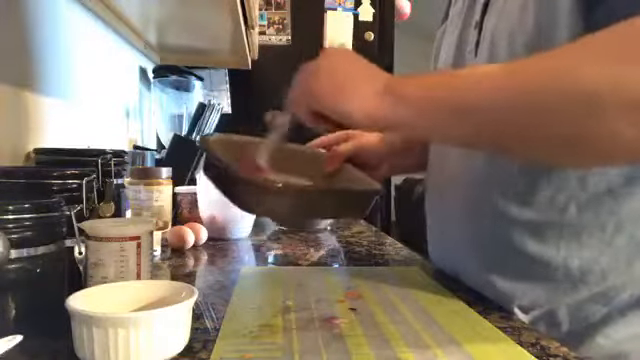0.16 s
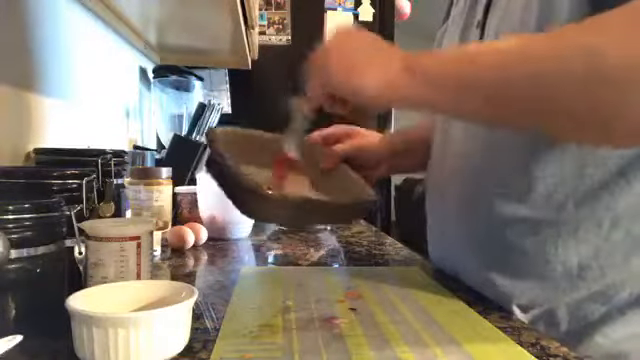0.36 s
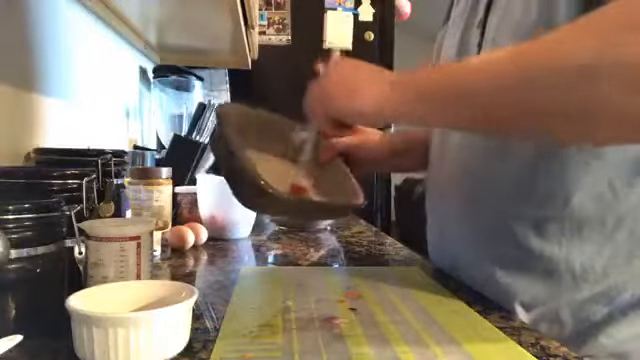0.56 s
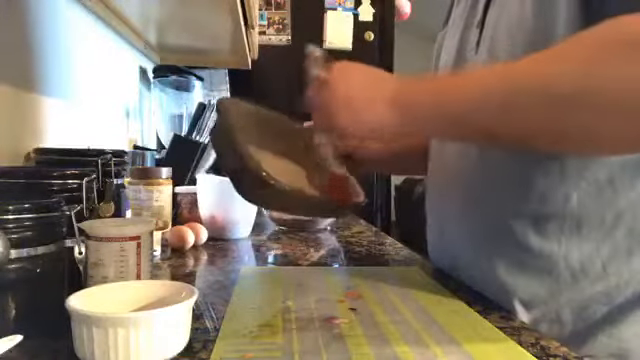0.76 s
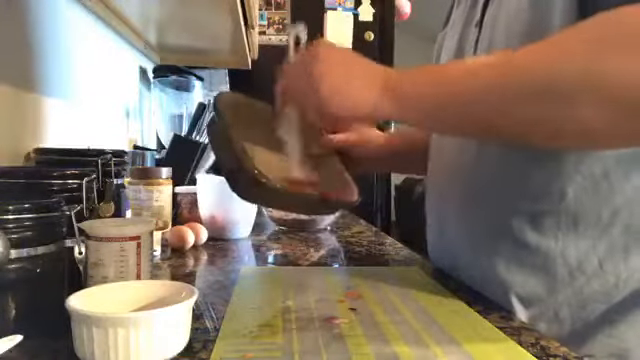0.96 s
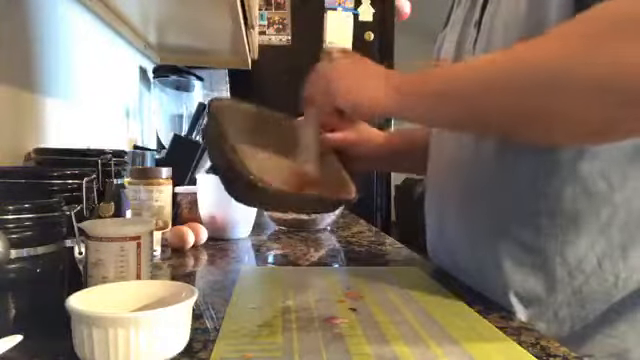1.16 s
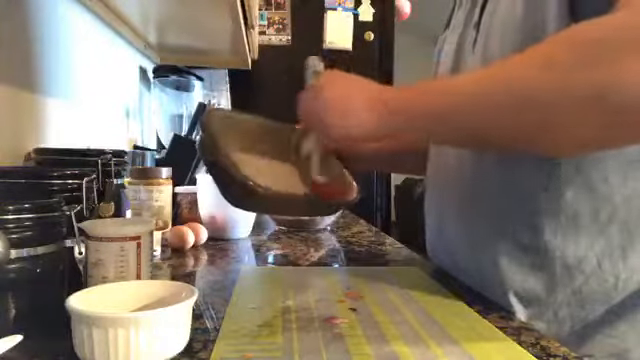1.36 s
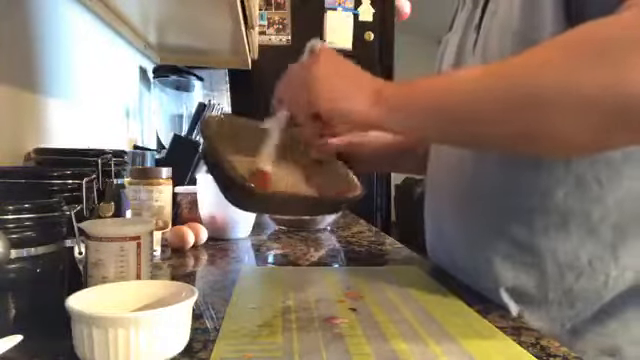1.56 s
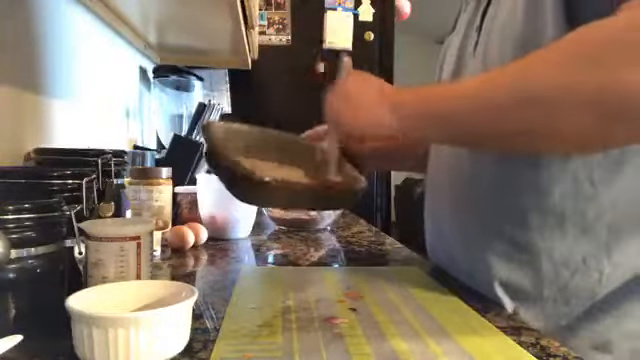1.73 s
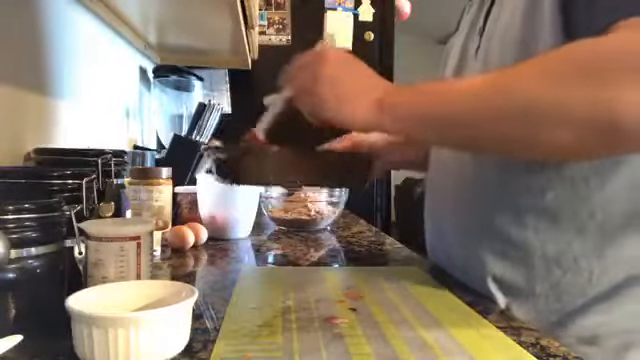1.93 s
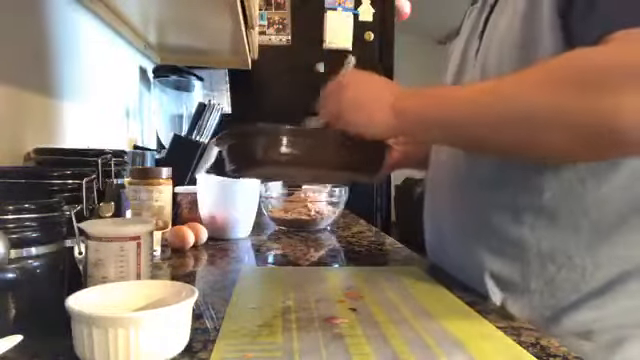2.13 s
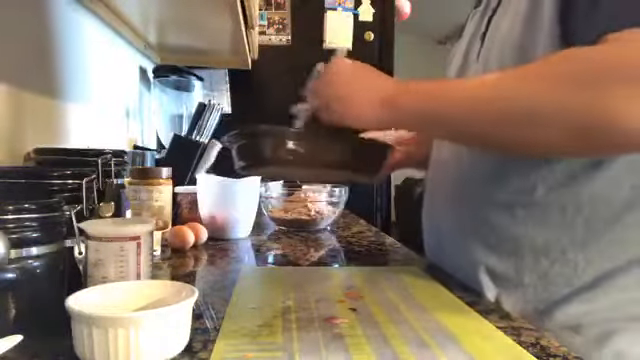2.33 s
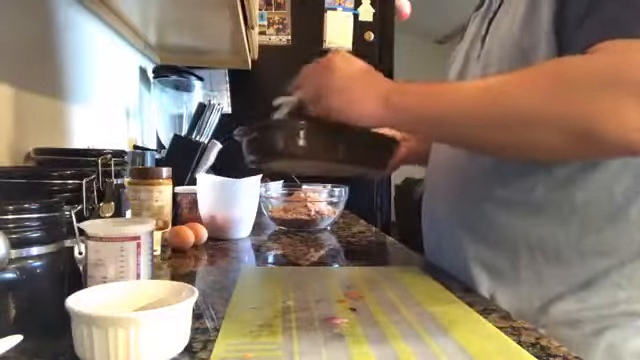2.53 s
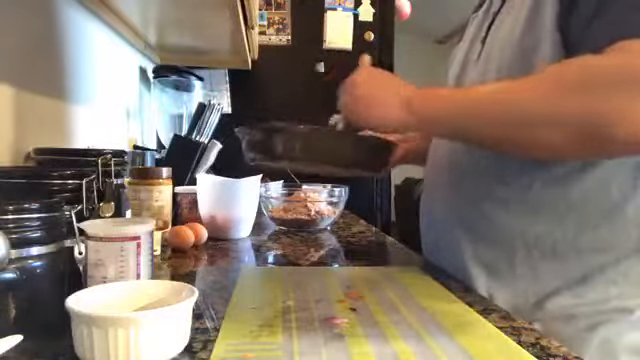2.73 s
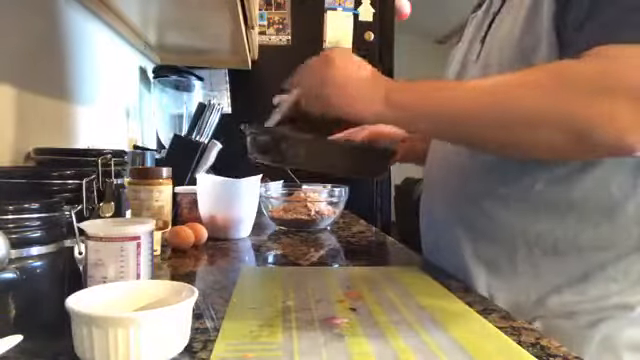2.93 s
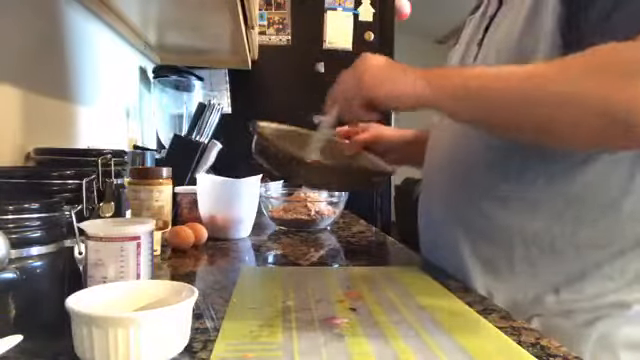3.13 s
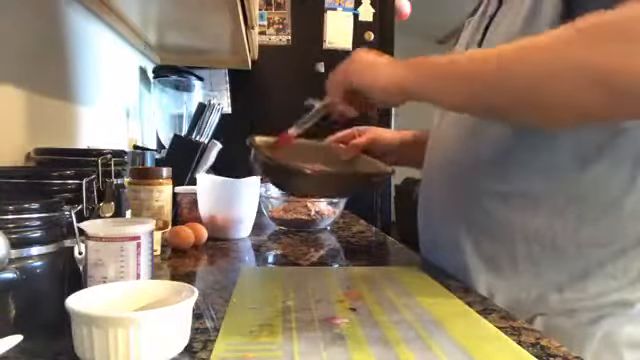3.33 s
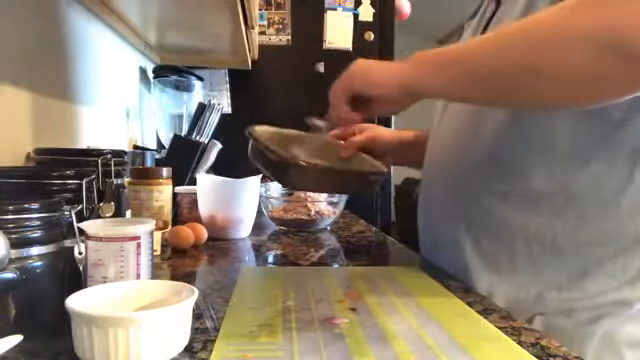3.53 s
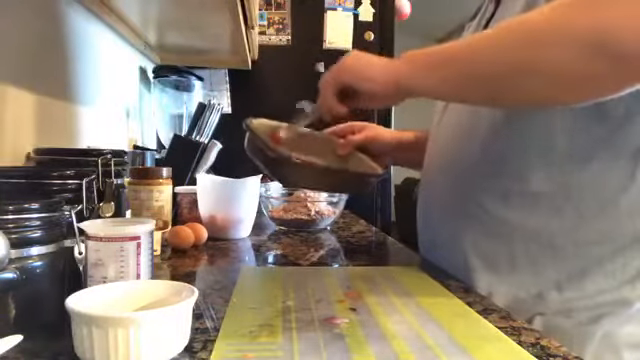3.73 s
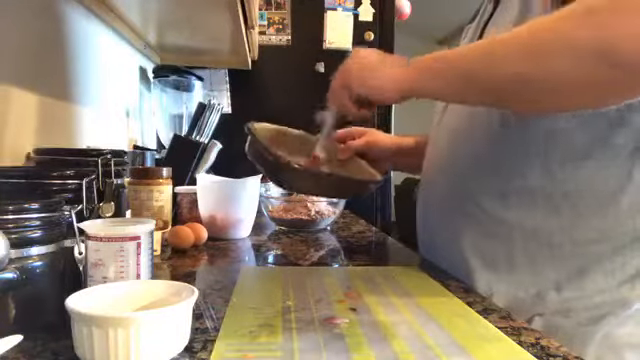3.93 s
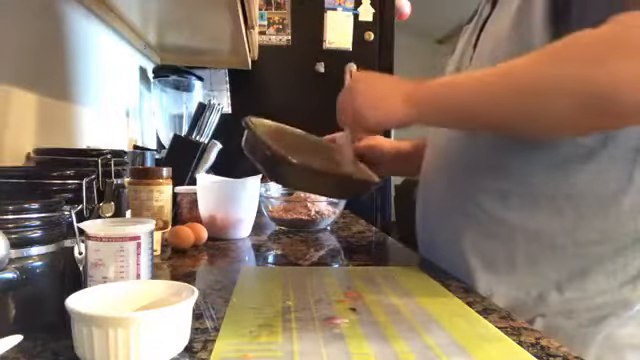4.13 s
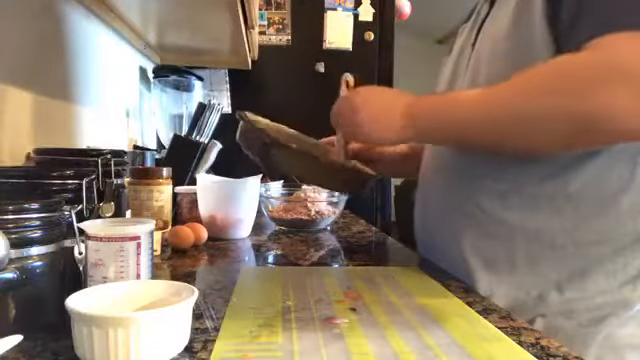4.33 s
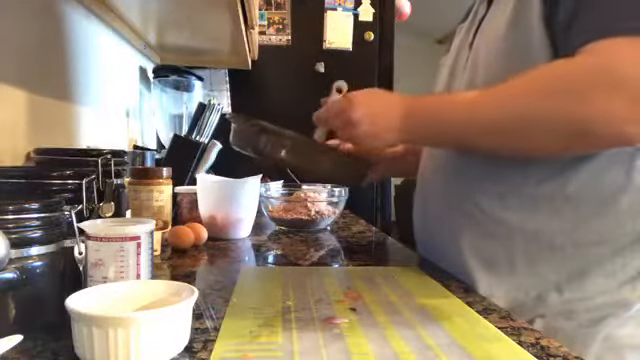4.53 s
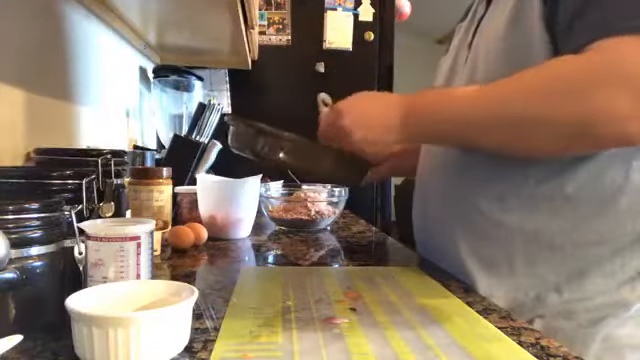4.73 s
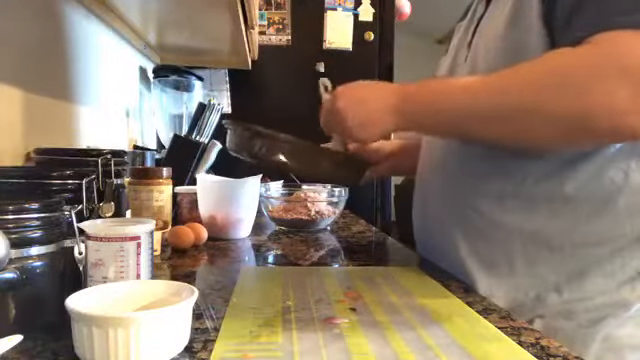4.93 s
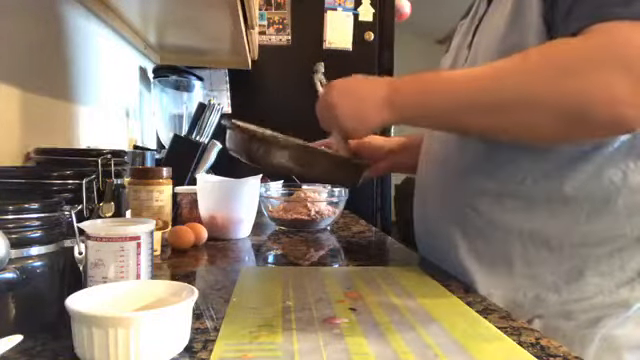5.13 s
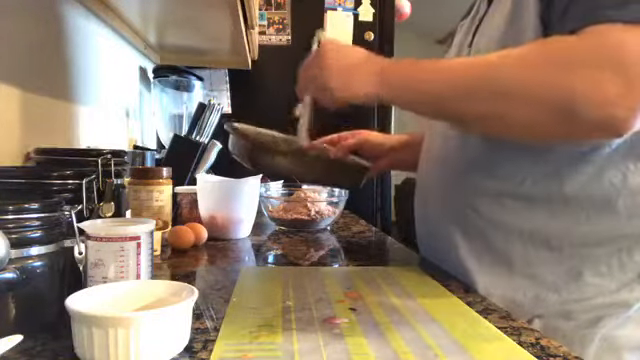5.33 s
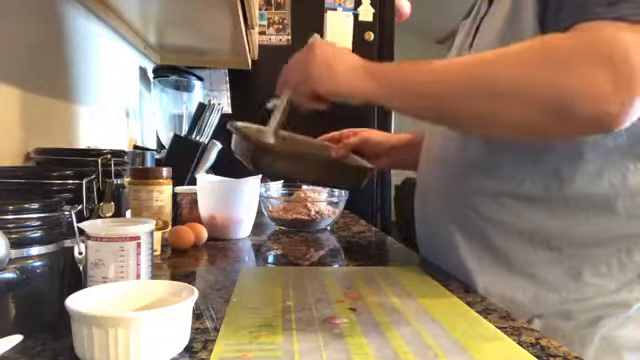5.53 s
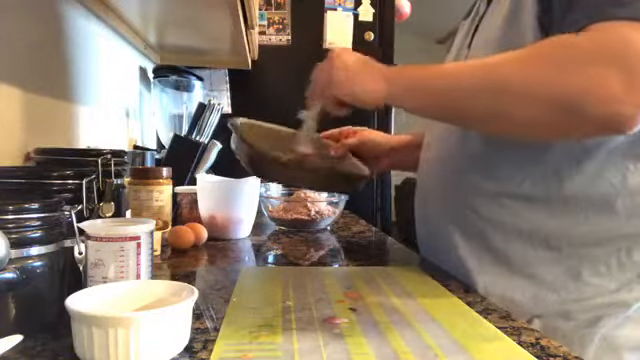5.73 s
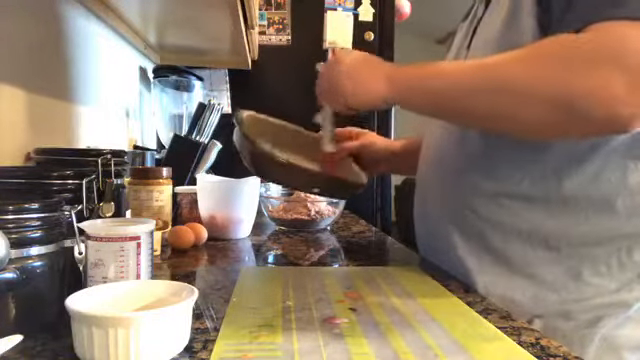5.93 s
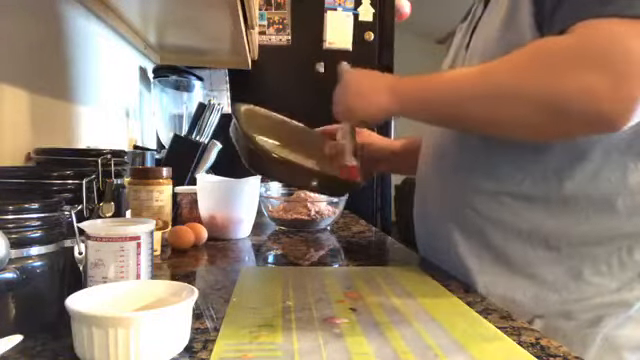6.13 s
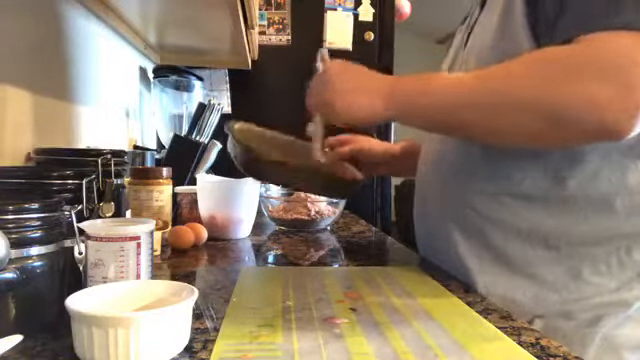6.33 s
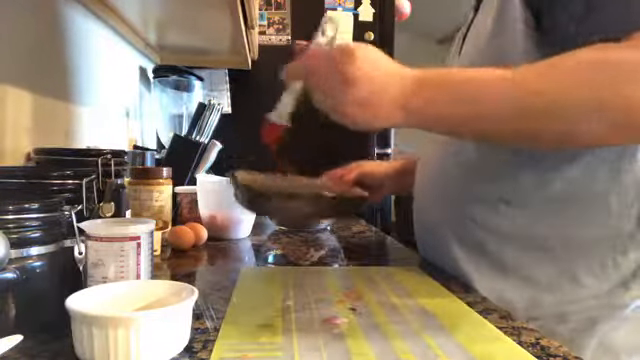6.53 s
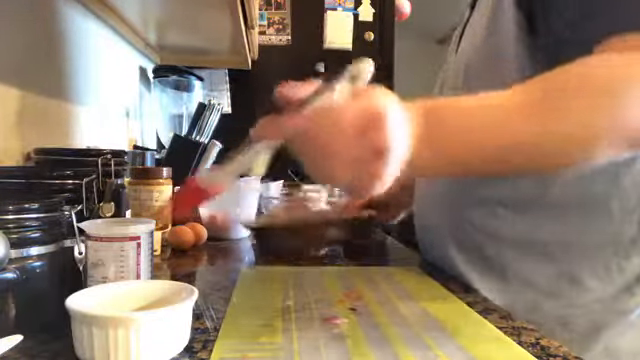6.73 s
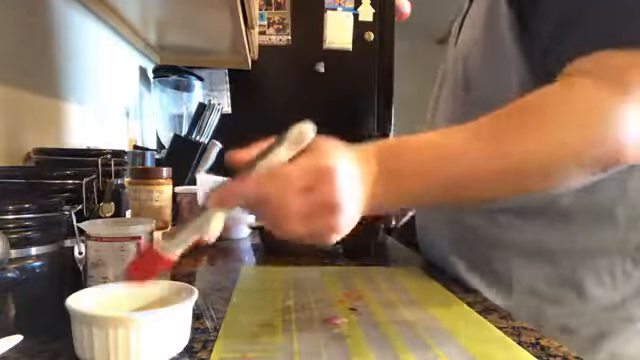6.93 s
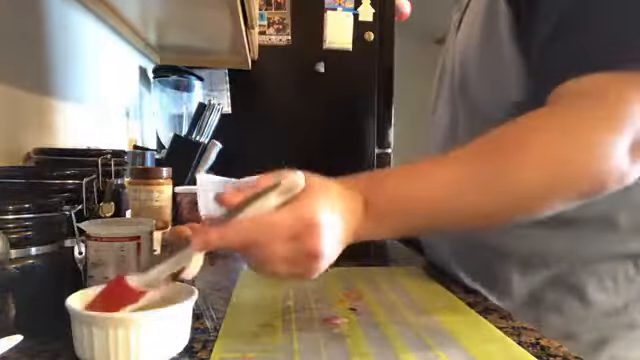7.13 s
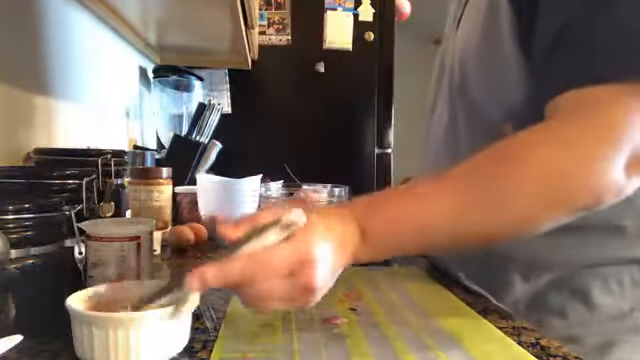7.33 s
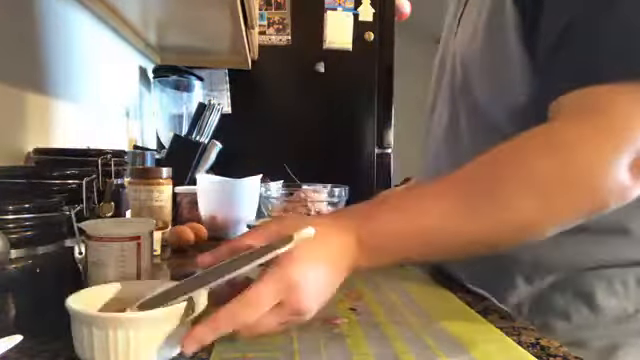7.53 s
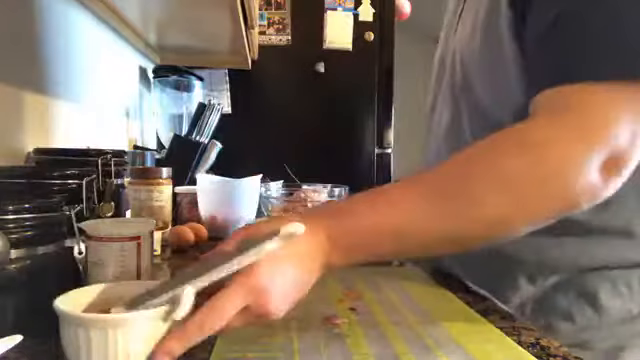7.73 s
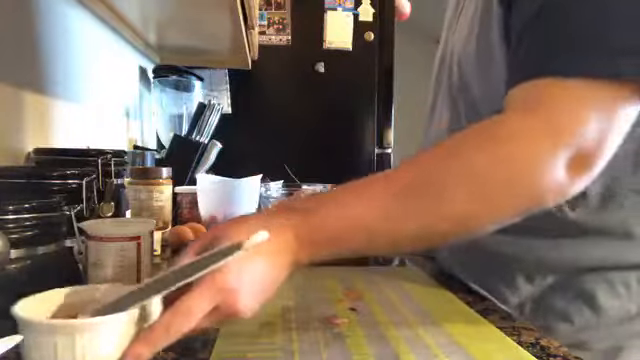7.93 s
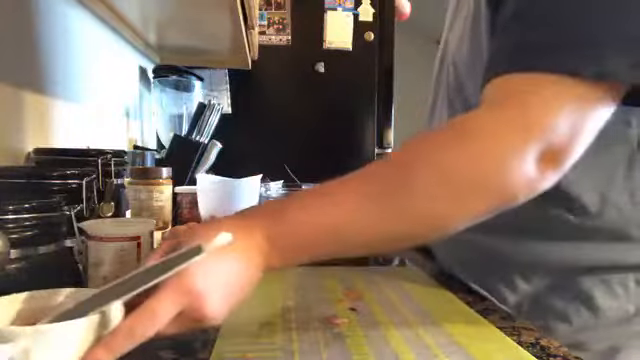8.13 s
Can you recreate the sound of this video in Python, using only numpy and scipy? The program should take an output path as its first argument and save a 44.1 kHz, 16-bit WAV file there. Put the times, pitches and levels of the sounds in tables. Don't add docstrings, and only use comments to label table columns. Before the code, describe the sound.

A quiet kitchen with low, soft room tone and barely audible hum, heard by a close microphone. From 0 to about 6.6 seconds a silicone brush sweeps around a hand-held stoneware dish in short, irregular strokes. Each is a light, bright hiss with faint ceramic ringing and occasional tiny rim ticks; one sharper tick comes at 0.9, and brisk strokes cluster around 1.2 to 1.3. Wet, oily pulls sound near 3.55 and 3.8, then the strokes become sparser and fainter. At about 6.77 the dish lands on stone in a loud, hard clatter of rapid contacts until 6.95, ringing briefly. Softer rocking knocks follow from 7.1 to 7.28. A light bowl touch comes at 7.37, then the brush drops in with a clear clack at 7.58. The bowl drags faintly over stone from 7.66, bumps crockery at 8.02, scrapes hardest at 8.07, and ends with small taps near 8.26.

```python
import sys
import numpy as np
from scipy import signal
from scipy.io import wavfile
from scipy.ndimage import uniform_filter1d

SR = 44100
rng = np.random.default_rng(int(sys.argv[2]) if len(sys.argv) > 2 else 0)


def wav_record(signal):
    frames = np.transpose(np.atleast_2d(signal))
    bounded = np.clip(frames, -1, 1)
    quanta = np.round(bounded * 32767).astype(np.int16)
    wavfile.write(sys.argv[1], SR, quanta)


def convert_level_to_amplitude(level_db):
    exponent = np.asarray(level_db, float) / 20
    return 10 ** exponent


N = 364693

# pitch_hz, density_db (per Hz)
ROOM_TONE = [(18, -46), (30, -3.5), (60, 3.5), (108, -2), (174, -10), (249, -11.5), (335, -9.5),
             (754, -17.5), (1500, -18.5), (2400, -27.5), (3620, -25.5), (6700, -27), (10000, -36.5),
             (16000, -31.5)]
# start_s, end_s, pitch_hz, level_db
HUMS = [
    (.5, 5.1, 120, -70),
    (.3, 2.3, 68, -73),
    (5.05, 5.45, 224, -80),
    (3.25, 3.7, 935, -85),
    (3.33, 3.46, 875, -77),
    (3.45, 3.72, 812, -77),
    (4.94, 5.12, 575, -77),
    (5.6, 6.07, 563, -78),
]
TONE_DB = -65

# pitch_hz, density_db (per Hz)
BRISTLE_HISS = [(240, -49), (400, -10), (511, -20.5), (1400, -15), (1540, -24.5), (2510, -14), (2750, -15),
                (11200, 6), (15500, 5.5)]
# fastest_s, swell_s, fade_s, hiss_db, push_db (into the dish)
FLAT_STROKES = [(0.0, 0.0073, 0.048, -60, -59), (.55, 0.096, 0.12, -65.5, -68),
                (.63, 0.074, 0.18, -57, -54.5), (.73, 0.045, 0.06, -63.5, -71),
                (.99, 0.11, 0.089, -58.5, -55.5), (1.165, .03, 0.13, -68.5, -68),
                (1.224, 0.033, 0.06, -45.5, -55), (1.285, 0.054, 0.061, -49, -63),
                (1.325, 0.061, 0.033, -49.5, -75), (1.7, 0.13, 0.037, -60.5, -65),
                (1.735, 0.051, 0.031, -59, -60), (2.68, 0.065, 0.052, -56, -60),
                (3.14, 0.18, 0.15, -64, -77), (3.55, 0.067, 0.12, -51.5, -58),
                (3.782, 0.014, 0.055, -65, -81), (3.84, 0.1, 0.058, -54.5, -69),
                (4.2, 0.088, 0.061, -60.5, -61), (4.715, 0.042, 0.12, -58.5, -66),
                (4.79, 0.076, 0.1, -65.5, -87), (4.99, 0.11, 0.12, -59.5, -74),
                (5.14, 0.022, 0.068, -65, -75), (5.22, 0.059, 0.079, -58, -84),
                (5.78, 0.13, 0.061, -66, -59.5), (6.17, 0.11, 0.061, -57, -59.5)]
# fastest_s, swell_s, fade_s, hiss_db, push_db (into the dish)
RIM_STROKES = [(0.059, 0.04, 0.057, -61.5, -54), (.26, 0.086, 0.095, -52, -56),
               (1.5, 0.2, 0.14, -58.5, -68), (1.8, 0.068, 0.048, -64, -78), (1.849, 0.096, 0.094, -62, -60),
               (2.16, 0.15, 0.13, -62.5, -55), (2.44, 0.1, 0.093, -63.5, -57.5),
               (2.57, 0.044, 0.047, -76, -58), (2.62, 0.047, 0.069, -62.5, -58),
               (2.73, 0.052, .06, -61.5, -70), (2.835, 0.062, 0.12, -58.5, -51.5),
               (2.9, 0.066, 0.085, -63.5, -66), (3.95, 0.1, 0.062, -75, -67), (4.08, 0.046, 0.22, -65, -69),
               (4.36, 0.17, 0.24, -68, -66), (5.32, 0.18, 0.1, -68, -75), (5.5, 0.1, 0.11, -67.5, -84),
               (5.89, 0.18, 0.067, -66.5, -58.5), (6.1, 0.069, 0.079, -66.5, -53),
               (6.34, 0.057, .05, -68.5, -75), (6.64, 0.14, 0.11, -76, -85)]
HISS_SHAPE, PUSH_SHAPE = 2.31, 2.5
FLAT_HIGH_DB, RIM_LOW_DB = 1, -6.5
RESTING_PUSH_DB = -75
BRIGHT_DB, BRIGHT_PER_DB = -7, 0.13
# pitch_hz, width_hz, level_db
DISH_HELD = [(1390, 5.2, -9), (2229, 40, 3), (2570, 82, 2.5), (3340, 13, -11), (3640, 52, 1),
             (4720, 48, -15.5), (5310, 18, -12.5)]
# start_s, peak_db, ring_db, favoured_hz
FLICKS = [(0.05, -55.5, 3.5, 3360), (0.205, -60, -10, 4720), (0.599, -66, -8, 1385),
          (0.888, -65.5, 4, 2570), (0.898, -41, -15, 1385), (1.19, -56, -19, 4720),
          (1.215, -42.5, -14, 1385), (1.284, -65, -17, 2570), (1.737, -62, -4, 2940),
          (2.107, -71, 11, 2570), (2.805, -60, -8, 3640), (2.83, -56, -7, 2215), (3.5, -55, -6, 5310),
          (3.513, -58, -3, 5310), (3.539, -58, -13, 5310), (3.771, -50, -9, 5310), (3.811, -57, -8, 3340),
          (4.21, -54, -24, 3340), (4.706, -64, -8, 5310), (4.97, -53, -9, 5310), (5.134, -56, -13, 2215),
          (5.212, -53, -5, 3640), (5.35, -72, 7, 3640), (5.46, -72, 7, 3640), (6.335, -67, -4, 3340)]
# loudest_s, swell_s, fade_s, level_db, pitch_hz
SINGING_LOW = [(0.06, 0.024, 0.025, -71, 2570), (0.075, 0.044, 0.09, -68.5, 2205),
               (0.274, 0.04, 0.025, -75, 2205), (0.619, 0.031, 0.075, -78, 2205),
               (0.624, 0.092, 0.071, -68, 1390), (0.663, 0.04, 0.073, -64, 2570),
               (0.693, 0.125, 0.07, -76, 1390), (0.903, 0.025, 0.015, -64, 2570),
               (0.913, 0.04, 0.078, -66, 1390), (1.008, 0.073, 0.058, -64, 1390),
               (1.033, 0.12, 0.054, -68.1, 2205), (1.227, 0.055, 0.028, -66.8, 2205),
               (1.227, 0.064, 0.12, -70, 1390), (1.257, 0.054, 0.11, -68, 2570),
               (1.322, 0.055, 0.039, -71, 2205), (1.746, 0.038, 0.015, -75, 2570),
               (1.831, 0.046, 0.093, -75, 1390), (1.846, 0.043, 0.07, -73, 2205),
               (2.11, 0.025, 0.025, -80, 2570), (2.18, 0.036, 0.081, -66, 2570),
               (2.18, 0.069, 0.05, -68, 2205), (2.449, 0.075, 0.03, -71, 2570),
               (2.454, 0.08, 0.045, -67, 2205), (2.564, 0.03, 0.04, -69, 2570),
               (2.649, 0.067, 0.12, -70, 2570), (2.659, 0.058, 0.067, -68, 2205),
               (2.679, 0.095, 0.032, -85, 1390), (2.839, 0.046, 0.069, -57, 2205),
               (2.854, 0.091, 0.075, -74, 1390), (3.293, 0.071, 0.04, -76, 1390),
               (4.979, 0.04, 0.035, -81, 2570), (4.989, 0.03, 0.039, -67, 2205),
               (5.787, 0.045, 0.18, -84, 2205), (5.792, 0.086, 0.14, -80, 1390),
               (6.136, 0.07, 0.082, -69.0, 2205), (6.161, 0.048, 0.022, -60, 2570)]
# loudest_s, fade_s, level_db, pitch_hz
SINGING_HIGH = [(.07, 0.051, -61, 3640), (.22, .03, -71, 4720), (.23, .05, -73, 5310),
                (.28, 0.032, -63, 3640), (.63, 0.044, -76, 3640), (.72, 0.052, -62, 3640),
                (.72, .04, -82, 3340), (.99, .04, -67, 5310), (1.01, .03, -70, 4720),
                (1.04, .06, -79, 3640), (1.22, .03, -64, 5310), (1.23, 0.046, -63, 3640),
                (1.23, 0.043, -62, 4720), (1.25, .11, -71, 1390), (1.31, .04, -64, 3340),
                (1.48, .07, -69, 3640), (1.85, 0.055, -62, 3640), (1.85, .04, -69, 3340),
                (1.85, .03, -66, 5310), (2.125, .08, -69, 3340), (2.13, 0.051, -71, 3640),
                (2.44, .05, -66, 3640), (2.45, .04, -84, 3340), (2.45, .02, -77, 5310),
                (2.62, .08, -73, 3640), (2.85, .06, -75, 3640), (3.53, .04, -61, 5310),
                (3.57, .04, -77, 3340), (3.775, .03, -87, 5310), (3.79, .05, -70, 3340),
                (3.83, .07, -68, 3340), (4.07, .04, -75, 3340), (4.15, .06, -82, 3640),
                (4.19, 0.037, -71, 3340), (4.36, .08, -74, 3340), (4.72, .04, -81, 3640),
                (5.225, 0.027, -85, 3340), (5.22, 0.036, -83, 3640), (5.363, 0.045, -65.5, 3640),
                (5.47, 0.031, -69, 3340), (5.478, 0.026, -68, 3640), (5.87, 0.033, -71, 3340),
                (6.12, 0.063, -74, 3640), (6.14, .05, -79, 3340)]
SING_SWELL_S = .045
# start_s, end_s, from_hz, to_hz, level_db
SQUEAK = (.765, .85, 11900, 10500, -82)
# loudest_s, swell_s, fade_s, level_db
GRIP = [
    (3.46, 0.092, 0.32, -69.5),
]
# low_hz, high_hz
GRIP_HZ = (830, 1620)
# loudest_s, swell_s, fade_s, level_db
SUCK = [
    (3.555, 0.034, 0.068, -49.5),
    (3.8, .025, 0.033, -56),
]
# low_hz, high_hz
SUCK_HZ = (5030, 7000)

# pitch_hz, level_db, t60_s
COUNTER = [(95.5, -28.5, 0.27), (139.5, -26, 0.13), (277, -21.5, 0.069), (377, -14.5, 0.046),
           (767, -10.5, 0.023), (917, 3, 0.016), (1200, -14.5, 0.14), (1440, 12.5, 0.0078),
           (2130, -9, 0.026), (3574, -12.5, 0.037)]
# start_s, thud_db, ring_db, hardness_hz (of the contact)
LANDING = [(6.769, -39.5, -46, 2450), (6.781, -32, -63.5, 2540), (6.791, -1.5, -14, 2900),
           (6.7938, -14, -18, 1360), (6.803, -35.5, -12.5, 3530), (6.809, -11.5, -18.5, 3000),
           (6.818, -9, -23, 3000), (6.827, -7.5, -47, 2420), (6.8575, -2.5, -10, 1850),
           (6.861, -10.5, -31, 1230), (6.884, -8.5, -27, 1500), (6.904, -18.5, -33, 1500),
           (6.919, -16.5, -57, 1500), (6.93, -24, -50, 1200), (6.943, -20, -50, 1200)]
DISH_HZ = [354, 733, 888, 935, 1087, 2216, 1257, 1332, 1394, 1562, 2114, 2174, 2192, 2346]
# level_db, t60_s
DISH_DECAY = [(-24, .2), (-16, 0.24), (-10.5, 0.14), (-12.5, .17), (-5.5, .2), (-15.5, 0.46), (-13, 0.14),
              (-15.5, .15), (-3.5, 0.14), (-12, .14), (-10, .12), (0.5, 0.22), (1.5, 0.22), (-11.5, .09)]
# pitch_hz, level_db, t60_s
DISH_UPPER = [(2940, -6.5, 0.075), (3140, -13.5, .12), (3340, -9, 0.14), (3576, -7, 0.21), (3640, -7, 0.17),
              (4330, -29, .05), (4722, -25.5, 0.55), (5060, -26, .15), (5290, -21.5, 0.16),
              (5790, -36, .12), (6800, -22.5, .07), (7210, -17, 0.17), (8355, -18.5, 0.1),
              (8600, -22, 0.12)]
# pitch_hz, level_db, t60_s
DISH_TOP = [(5950, -16.5, .05), (6300, -23, .15), (6540, -22, .1), (7550, -20, .15), (7600, -15.5, .12),
            (7900, -16.5, .12), (9030, -17, .1), (9400, -19, .1), (9450, -12, 0.11), (9950, -11, 0.22),
            (10300, -11, .13), (11100, -4.5, 0.07), (11550, -4.5, .06), (12250, -8, .07)]
TOP_DB = -9.5
# start_s, thud_db, ring_db, hardness_hz
ROCKING = [
    (7.091, -31.5, -31, 1790),
    (7.192, -24, -29, 1500),
    (7.198, -37, -44, 1200),
    (7.207, -29.5, -33, 1020),
    (7.236, -34.5, -32, 1190),
    (7.28, -57, -57, 808),
]
# pitch_hz, level_db, t60_s
DISH_DAMPED = [(240, -19.5, 0.19), (361, -2.5, 0.066), (664, -26, 0.09), (855, 1.5, 0.029),
               (1110, -5, 0.039), (1300, -9.5, 0.19), (2000, -24, 0.05)]

# start_s, thud_db, ring_db, hardness_hz
BOWL_TAPS = [
    (7.374, -42.5, -35, 2940),
    (7.378, -39.5, -56, 1500),
    (7.693, -56, -52, 4000),
    (7.888, -61, -52, 2480),
]
# pitch_hz, level_db, t60_s
BOWL = [(343, 0.5, 0.03), (835, -1, 0.018), (1247, 4, 0.026), (1500, -32, .04), (2300, -23, .06),
        (2623, 9, 0.038), (3550, -22, 0.027)]
# start_s, thud_db, ring_db, hardness_hz
BRUSH_DROP = [
    (7.584, -22, -45, 1500),
    (7.587, -10.5, -21, 2250),
    (7.592, -20, -39, 1500),
    (7.6, -25, -38, 1945),
    (7.63, -37, -58, 1500),
]
# pitch_hz, level_db, t60_s
HANDLE = [(128, -17, 0.45), (172, -14, 0.11), (550, -5, 0.049), (850, 5, 0.026), (1030, -13, 0.019),
          (1160, -4, 0.096), (1390, -27, 0.055), (2225, 1.5, 0.11), (3570, -17, 0.029), (4710, 4.5, 0.049),
          (5100, -12, .03), (8403, -22, 0.12), (10000, -16, 0.087), (11800, -34, 0.073)]
# start_s, drag_db
SLIDE = [
    (7.66, -71),
    (7.732, -66.5),
    (7.806, -81),
    (7.884, -70.5),
    (7.972, -71.5),
    (8.054, -58.5),
    (8.072, -53.5),
    (8.088, -64.5),
    (8.27, -65),
]
GRIT_DB = -4.5
# start_s, thud_db, ring_db, hardness_hz
BUMPS = [
    (8.017, -30.5, -24, 4940),
    (8.026, -23, -24, 690),
    (8.066, -36.5, -42, 3430),
    (8.071, -41, -34, 7000),
    (8.103, -51, -55, 13300),
    (8.116, -53, -58, 6070),
    (8.255, -45, -42, 4000),
    (8.261, -51, -53, 1200),
]
# pitch_hz, level_db, t60_s
CROCKERY = [(172, -11.5, 0.053), (240, -5.5, 0.061), (500, -7.5, 0.058), (1190, -6.5, 0.045),
            (1890, -1, 0.0059), (2360, -5, 0.034), (2690, -5, 0.024), (4200, -20, 0.041),
            (5550, -28.5, 0.034), (6530, -16, .06)]

# pitch_hz, t60_s
REVERB = [(100, 1), (500, 0.44), (2000, 0.48), (4500, 0.36), (15000, 0.15)]
WET_DB = -16.5


def rms_one(x):
    return x / np.sqrt(np.mean(x ** 2) + 1e-20)


def at_hz(points, hz):
    table_hz, values = np.transpose(points)
    return np.interp(np.log(hz), np.log(table_hz), values)


def band_pass(x, band_hz, order):
    return signal.sosfilt(signal.butter(order, band_hz, "band", fs=SR, output="sos"), x)


def drift(rate):
    knots = rng.standard_normal(N // 100 + 500)
    r = np.exp(-200 * np.pi * rate / SR)
    slow = signal.lfilter([1], [1, -2 * r, r * r], knots)[498:]
    return np.interp(np.arange(N) / 100, np.arange(len(slow)), rms_one(slow))


def ring(clicks, hz, t60):
    r, w = convert_level_to_amplitude(-60 / (t60 * SR)), 2 * np.pi * hz / SR
    return signal.lfilter([0, np.sin(w)], [1, -2 * r * np.cos(w), r * r], clicks + 1e-18)


def bands(x, gain):
    edges = np.append(22 * 2 ** np.arange(0, 9.5, .5), [13500, 18000])
    out = 0
    for k, (lo, hi) in enumerate(zip(edges, edges[1:])):
        out = out + gain(np.sqrt(lo * hi)) * band_pass(x[k % 2], [lo, hi], 2)
    return out


def grains(per_s, spread_db):
    sizes = convert_level_to_amplitude(spread_db * np.minimum(rng.exponential(1, (2, N)), 4))
    sizes = sizes * rng.choice([-1, 1], (2, N))
    return rms_one(sizes * (rng.random((2, N)) < per_s / SR))


def bells(rows, shape, column):
    s, swell, fade, db = np.transpose(rows)[[0, 1, 2, column], :, None]
    late = np.arange(0, N + 50, 50) / SR - s
    part = np.clip(1 - np.where(late < 0, -late / swell, late / fade), 0, 1)
    power = (convert_level_to_amplitude(db) * np.sin(1.343 * part) ** shape / np.sin(1.2) ** shape) ** 2
    return np.interp(np.arange(N) / 50, np.arange(late.shape[1]), np.sqrt(power.sum(axis=0)))


def background():
    t = np.arange(N) / SR
    noise = rng.standard_normal((2, N))
    tone = rms_one(bands(noise, lambda hz: convert_level_to_amplitude(at_hz(ROOM_TONE, hz) + 2.0 * drift(1.0))))
    out = convert_level_to_amplitude(TONE_DB) * tone
    for start, end, hz, db in HUMS:
        on = np.clip(np.minimum(t - start, end - t) / 0.023, 0, 1)
        level = on * convert_level_to_amplitude(db + 4.5 + 3.7 * drift(10.0))
        out += level * np.sin(2 * np.pi * hz * t + 0.63 * drift(8.1))
    return out


def bristle_hiss(slips):
    pressure = bells(FLAT_STROKES + RIM_STROKES, HISS_SHAPE, column=3)
    bright_db = BRIGHT_DB + BRIGHT_PER_DB * (20 * np.log10(pressure + 1e-4) + 60)
    tilt = np.clip(bright_db + 3.0, -15, 8) * 2.95

    def colour(hz):
        tilted = tilt * np.clip(np.log2(hz / 7000), -1, 1)
        patchy = 3.5 * np.clip(np.log2(hz / 1200), 0, 1) * drift(14)
        return convert_level_to_amplitude(at_hz(BRISTLE_HISS, hz) + tilted + patchy)

    hiss = bands(slips, colour)
    even = hiss / np.sqrt(uniform_filter1d(hiss ** 2, size=3000))
    return pressure * convert_level_to_amplitude(1.4 * drift(35)) * even


def flick_clicks():
    s, peak_db = np.transpose(FLICKS)[:2]
    at, clicks = np.round(s * SR).astype(int), np.zeros(N)
    clicks[at] = convert_level_to_amplitude(peak_db)
    return at, clicks


def flick_ticks(slips):
    clicks = flick_clicks()[1]
    spit = signal.lfilter([1], [1, -convert_level_to_amplitude(-60 / (0.021 * SR))], clicks) * slips
    spit = signal.sosfilt(signal.butter(2, 3500, "high", fs=SR, output="sos"), spit)
    return 0.36 * spit + 0.96 * ring(clicks, 5500, 0.009)


def held_dish(slips):
    flat = bells(FLAT_STROKES, PUSH_SHAPE, column=4)
    rim = bells(RIM_STROKES, PUSH_SHAPE, column=4)
    held = np.arange(N) < LANDING[0][0] * SR
    low = flat + rim * convert_level_to_amplitude(RIM_LOW_DB) + held * convert_level_to_amplitude(RESTING_PUSH_DB)
    high = flat * convert_level_to_amplitude(FLAT_HIGH_DB) + rim + held * convert_level_to_amplitude(RESTING_PUSH_DB - 7)
    at = flick_clicks()[0]
    _, peak_db, ring_db, favoured_hz = np.transpose(FLICKS)
    song = 0
    for hz, width_hz, db in DISH_HELD:
        pushed = low if hz < 3000 else high
        level = convert_level_to_amplitude(-15.0 + db + 2.5 * drift(2.5))
        push = slips * pushed * level * np.sqrt(4 * np.pi * width_hz / SR)
        push[at] += convert_level_to_amplitude(peak_db + ring_db - 15 * np.abs(np.log2(hz / favoured_hz)))
        song = song + ring(push, hz, np.log(1000) / (np.pi * width_hz))
    return song


def singing(slips):
    high = [(s, SING_SWELL_S, fade, db, hz) for s, fade, db, hz in SINGING_HIGH]
    rows = np.array(SINGING_LOW + high)
    held_hz, out = np.array(DISH_HELD)[:, 0], 0
    nearest = np.abs(np.log(rows[:, 4:] / held_hz)).argmin(axis=1)
    for k, (hz, width_hz, _) in enumerate(DISH_HELD):
        tone = ring(slips, hz, np.log(1000) / (np.pi * .5 * width_hz))
        even = tone / np.sqrt(uniform_filter1d(tone ** 2, size=1500) + 1e-12)
        out = out + bells(rows[nearest == k], 1.96, column=3) * even
    return out


def bristle_squeak():
    start, end, from_hz, to_hz, db = SQUEAK
    part = np.clip((np.arange(N) / SR - start) / (end - start), 0, 1)
    turns = np.cumsum(from_hz + (to_hz - from_hz) * part) / SR
    return convert_level_to_amplitude(db) * np.sin(np.pi * part) * np.sin(2 * np.pi * turns)


def rub(slips, rows, band_hz):
    return rms_one(band_pass(slips, band_hz, 2)) * bells(rows, 1.8, column=3)


def brush():
    slips = grains(6000, spread_db=1.5)
    strokes = bristle_hiss(slips) + flick_ticks(slips[1]) + held_dish(slips[0])
    rubs = rub(slips[1], GRIP, GRIP_HZ) + rub(slips[1], SUCK, SUCK_HZ)
    return strokes + singing(slips[1]) + bristle_squeak() + rubs


def knocks(rows, body, crack_db, crack_t60):
    out, t = np.zeros(N), np.arange(SR // 2) / SR
    luck = rng.standard_normal((len(rows), len(body)))
    crowd_hz, crowd_db = rng.uniform(4000, 15000, 36), rng.normal(0, 5, 36)
    for (s, thud_db, ring_db, hard_hz), own in zip(rows, luck):
        modes = [(hz, db + thud_db, t60) for hz, db, t60 in COUNTER]
        modes += [(hz, db + ring_db + 2 * u, t60) for (hz, db, t60), u in zip(body, own)]
        modes += [(hz, db + ring_db - 30, 0.11 * (8000 / hz) ** 0.33) for hz, db in zip(crowd_hz, crowd_db)]
        hz, db, t60 = np.transpose(modes)[:, :, None]
        sign = (-1) ** np.arange(len(modes))[:, None]
        soft = 1 / (1 + (hz / hard_hz) ** 2)
        partials = sign * soft * convert_level_to_amplitude(db - 60 * t / t60) * np.sin(2 * np.pi * hz * t)
        sound = partials.sum(axis=0) * .6
        crack = rms_one(band_pass(rng.standard_normal(len(t)), [600, min(hard_hz, 15000)], 4))
        sound += crack * convert_level_to_amplitude(thud_db + crack_db - 60 * t / crack_t60)
        rise = np.sin(np.pi / 2 * np.minimum(t * hard_hz / 3.85, 1)) ** 2
        at = round(s * SR - 1.5 * SR / hard_hz)
        out[at:at + len(t)] += (rise * sound)[:N - at]
    return out


def dish_on_counter():
    free = [(hz, db, t60) for hz, (db, t60) in zip(DISH_HZ, DISH_DECAY)] + DISH_UPPER
    free = free + [(hz, db + TOP_DB, min(t60, .2)) for hz, db, t60 in DISH_TOP]
    landing = knocks(LANDING, free, crack_db=-12.0, crack_t60=0.06)
    return landing + knocks(ROCKING, DISH_DAMPED, crack_db=-12.0, crack_t60=0.07)


def bowl_contacts():
    taps = knocks(BOWL_TAPS, BOWL, crack_db=-8.5, crack_t60=0.1)
    return taps + knocks(BUMPS, CROCKERY, crack_db=-6.5, crack_t60=0.052)


def brush_drop():
    return knocks(BRUSH_DROP, HANDLE, crack_db=-20.0, crack_t60=0.078)


def bowl_slide():
    s, db = np.transpose(SLIDE)
    drag_db = np.interp(np.arange(N) / SR, s, db, -120, -120)
    slips = grains(2100, spread_db=-4.5)
    modes = [(1260, .025, .8), (2670, .04, .45), (1800, .006, 1.4), (340, .04, .25)]  # pitch_hz, t60_s, share
    hum = rms_one(sum(share * ring(slips[k % 2], hz, t60) for k, (hz, t60, share) in enumerate(modes)))
    grit = rms_one(band_pass(slips[1], [2000, 6000], 1))
    return convert_level_to_amplitude(drag_db) * (convert_level_to_amplitude(3.0) * hum + convert_level_to_amplitude(GRIT_DB) * grit)


def kitchen(x):
    t = np.arange(N) / SR

    def decay(hz):
        return convert_level_to_amplitude(-60 * t / at_hz(REVERB, hz) - 2.0 * max(np.log2(hz / 1500), 0))

    tail = bands(rng.standard_normal((2, N)), decay)[:SR]
    tail = tail * np.clip((t[:SR] - .004) / 0.0014, 0, 1)
    return signal.fftconvolve(x, tail / np.sqrt(np.sum(tail ** 2)))[:N]


def scene():
    near = brush() + dish_on_counter() + bowl_contacts() + brush_drop() + bowl_slide()
    return (near + convert_level_to_amplitude(WET_DB) * kitchen(near) + background())[None]


def treble_dropouts(x):
    bins = signal.stft(x, nperseg=1024)[2]
    share = .045 * np.clip(np.linspace(-.35, 1.6, 129), 0, 1.2)[:, None]
    chosen = 1. * (rng.random((129, bins.shape[2])) < share)
    lost = uniform_filter1d(chosen, size=3, axis=1) > 0
    gain = np.repeat(1 - .9 * lost, 4, axis=0)[:513]
    return signal.istft(bins * gain, nperseg=1024)[1][:, :N]


def roll_off(x):
    return signal.sosfilt(signal.butter(12, 16460, fs=SR, output="sos"), x)


def record(dry):
    x = signal.sosfilt(signal.butter(2, 40, "high", fs=SR, output="sos"), dry)
    x = .95 * np.tanh(x / .95)
    x = signal.sosfilt(signal.cheby2(16, 70, 16350, fs=SR, output="sos"), x)
    mix = treble_dropouts(x)
    return roll_off(mix)


dry = scene()
out = record(dry)
wav_record(out)
```